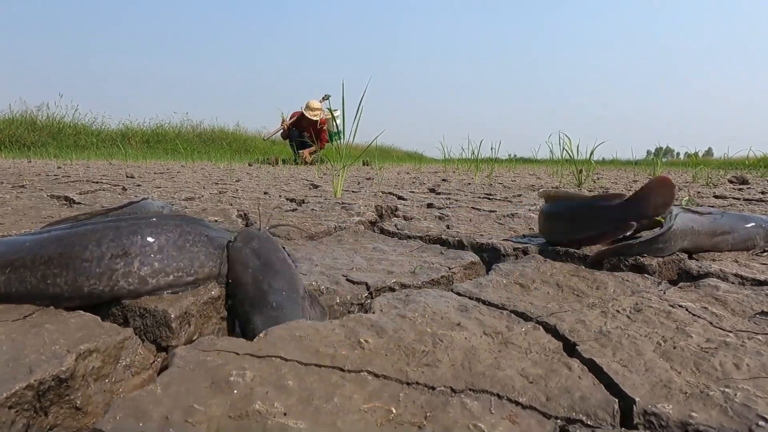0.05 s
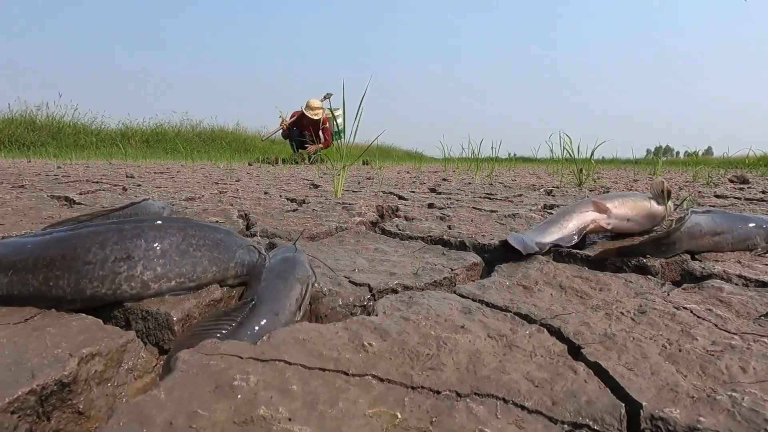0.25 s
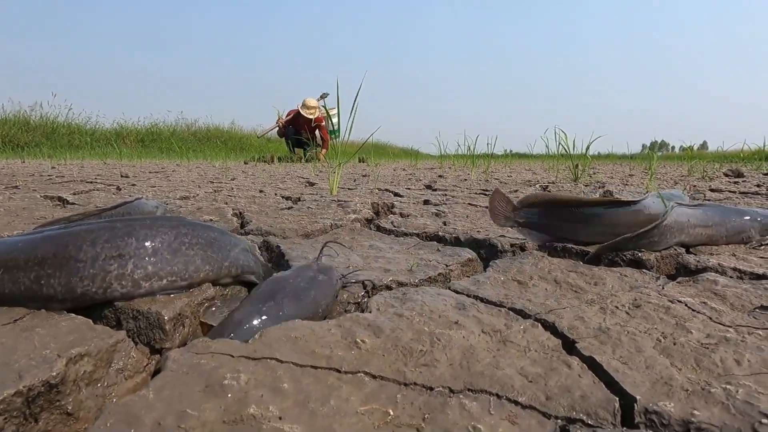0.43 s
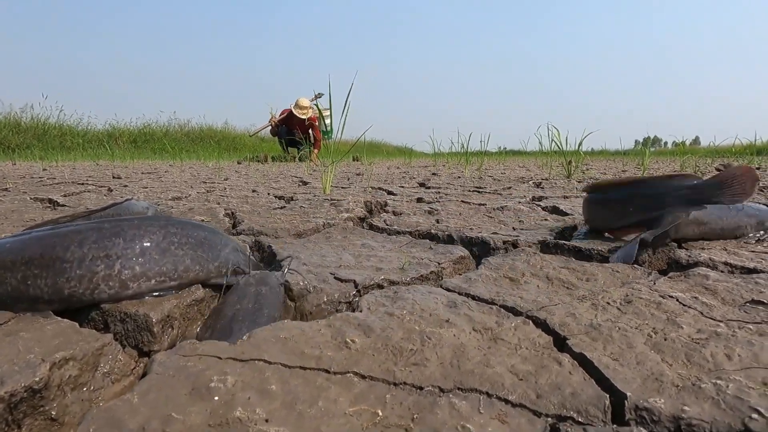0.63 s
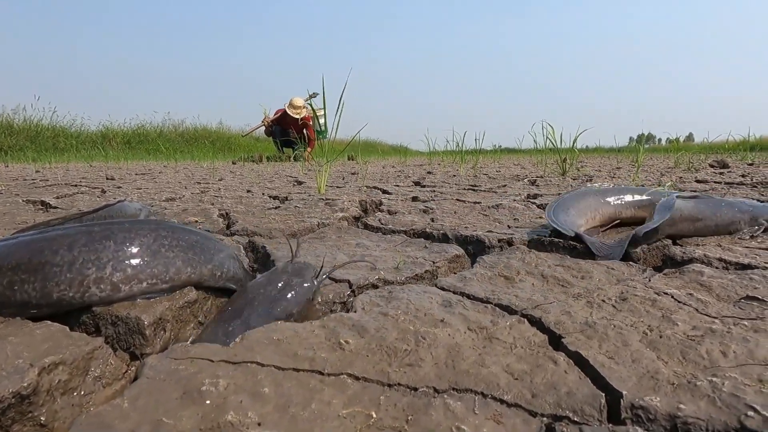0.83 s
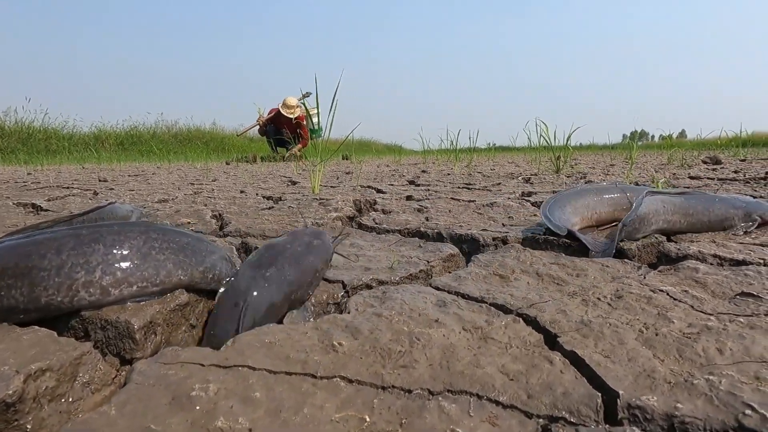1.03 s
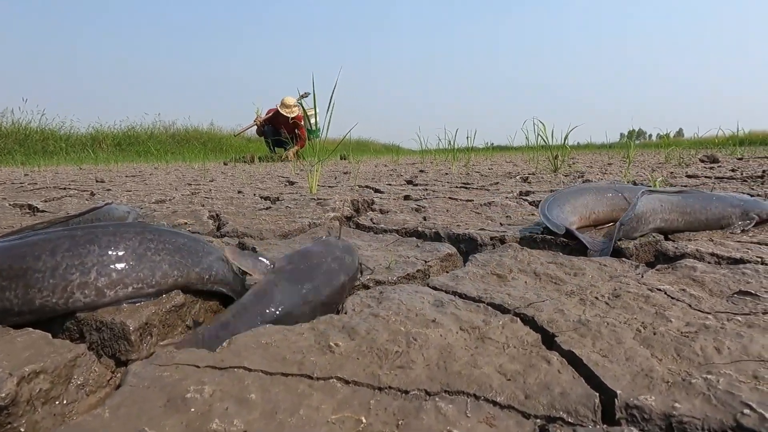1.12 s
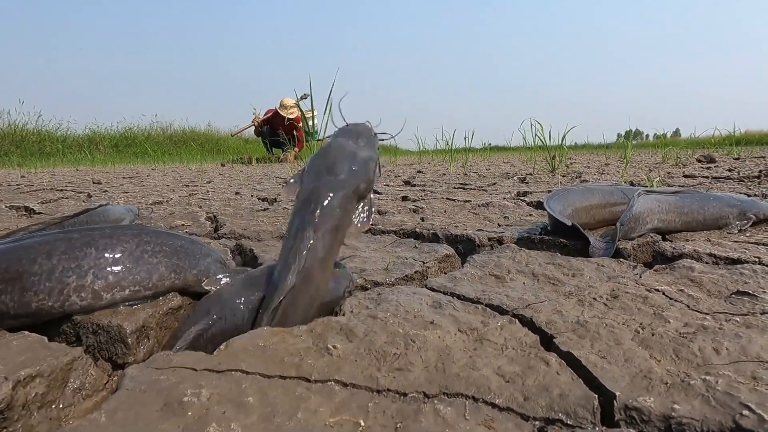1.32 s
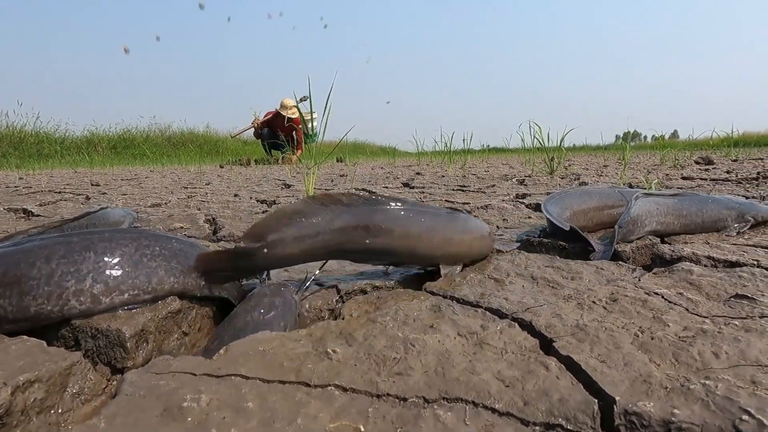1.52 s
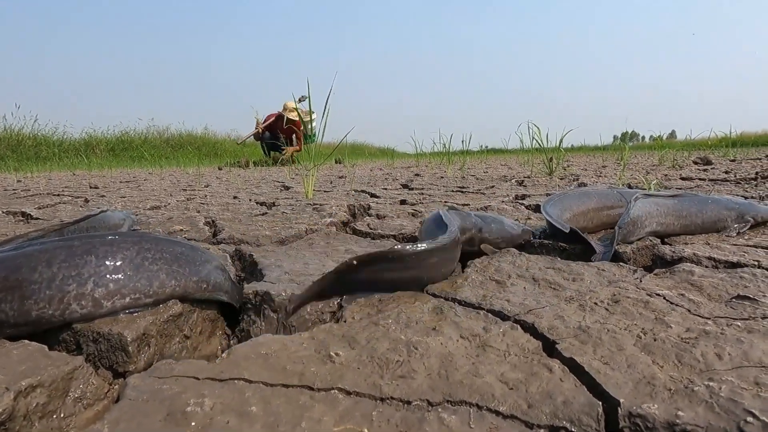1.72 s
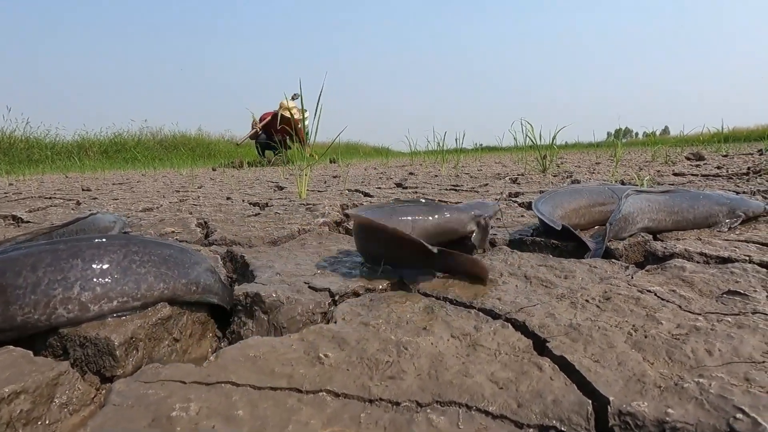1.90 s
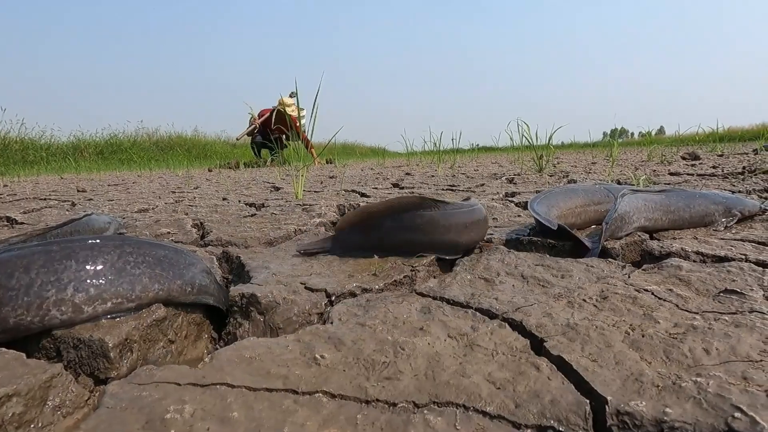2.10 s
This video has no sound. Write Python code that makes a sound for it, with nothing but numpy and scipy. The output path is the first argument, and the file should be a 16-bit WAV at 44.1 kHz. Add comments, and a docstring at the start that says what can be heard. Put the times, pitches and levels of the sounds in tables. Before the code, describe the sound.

Large fish thrash on cracked mud close to the microphone. Two bouts of wet squelching, popping and smacking come with dull thuds as their bodies land, over a light outdoor wind rumble and faint hiss.

```python
"""Catfish thrash on cracked mud close by, over a light wind rumble and a faint hiss.
Air pockets pop under their wet bodies, each stroke drags a crackling squelch of tiny bubbles
over the crust, and slimy skin smacks as it peels away. Heavy flops thud through the ground,
and the wet sounds bounce back faintly off the clods."""
import sys
import numpy as np
from scipy import signal
from scipy.fft import rfft, irfft
from scipy.io import wavfile

SR = 44100
rng = np.random.default_rng(int(sys.argv[2]) if len(sys.argv) > 2 else 0)


def dump_mix(stems):
    """Bounce the given channels to the path in sys.argv[1] as a 16-bit WAV at rate SR."""
    frames = np.atleast_2d(stems).T  # one column per channel
    limited = np.clip(frames, -1, 1)  # hard clip at full scale
    pcm = np.round(limited * 32767).astype(np.int16)
    wavfile.write(sys.argv[1], SR, pcm)


N = 94815
FFT_SIZE = N + 2048  # spare room for filters to ring out


def gain(db):
    """Turn decibels into a number to multiply by."""
    return 10 ** (np.asarray(db) / 20)


def normalise(x):
    """Scale a sound to an average strength (rms) of 1."""
    return x / np.sqrt(np.mean(x ** 2) + 1e-20)


def curve(points):
    """Join (frequency, value) points into a curve over the whole spectrum."""
    hz, value = np.array(points, float).T
    spectrum_hz = np.maximum(np.fft.rfftfreq(FFT_SIZE, 1 / SR), 1)
    return np.interp(np.log(spectrum_hz), np.log(hz), value)


def colour(x, points):
    """Turn frequencies up or down along a curve of f/Hz, level/dB points."""
    return irfft(rfft(x, FFT_SIZE) * gain(curve(points)), FFT_SIZE)[..., :N]


def noise_band(size, hz, octaves, spiky=0):
    """Noise reaching so many octaves either side of a pitch; spiky noise crackles."""
    edges = [hz / 2 ** octaves, min(hz * 2 ** octaves, SR / 2 - 1000)]
    noise = rng.standard_normal(size) * np.exp(spiky * np.minimum(rng.standard_normal(size), 2))
    return normalise(signal.sosfilt(signal.butter(2, edges, "band", fs=SR, output="sos"), noise))


def swell(t, rise, fade):
    """Rise smoothly from t = 0, then die away."""
    return np.sin(np.pi / 2 * np.clip(t / rise, 0, 1)) ** 2 * np.exp(-np.maximum(t - rise, 0) / fade)


def add(out, start, x):
    """Mix a sound in at a start time in seconds."""
    i = int(np.clip(start * SR, 0, N))
    out[..., i:i + x.shape[-1]] += x[..., :N - i]


def two_sides(source, apart):
    """Left and right of a random sound: alike when apart is 0, unrelated when it is 1."""
    return np.sqrt(1 - apart) * source() + np.sqrt(apart) * np.array([source(), source()])


# The tone of the wind: f/Hz, relative level/dB
WIND_TONE = [(12, -13), (22, -10), (42, 5), (62, -9), (93, -2.5), (130, -22), (185, -13), (230, -27),
             (500, -56), (2000, -66)]


def wind():
    """A low rumble, nearly the same on both sides, that rises and falls in gusts."""
    gusts = normalise(colour(rng.standard_normal(N), [(1, 10.5), (6, 12), (20, -86)]))
    noise = rng.standard_normal(N) + gain(-17) * rng.standard_normal((2, N))
    return gain(-43 + 5 * gusts) * normalise(colour(noise, WIND_TONE))


# The tone of the outdoor hiss: f/Hz, relative level/dB
HISS_TONE = [(60, -5), (250, -3), (480, 2), (780, -22), (1100, -13), (2500, -49), (5000, -35),
             (7000, -23.5), (10000, -29), (15000, -29)]


def hiss():
    """The faint, even noise of the open air, partly shared by both sides."""
    noise = rng.standard_normal((2, N)) + rng.standard_normal(N)
    return gain(-63.5) * normalise(colour(noise, HISS_TONE))


# Air pockets popping between skin and mud: t/s, f/Hz, level/dB, rise/s, fade/s, pitch slide/octaves
AIR_POCKETS = [(0.013, 1680, -39.5, 0.00047, 0.0033, 0.68), (0.158, 1043, -48.5, 0.0025, 0.0049, 0.58),
               (0.26, 893, -19, 0.0072, 0.0062, 0.84), (0.3411, 3980, -29.5, 0.001, 0.0021, -0.035),
               (0.34, 3230, -32.5, 0.0014, 0.0055, -0.081), (0.3403, 6730, -38, 0.0013, 0.003, -0.23),
               (0.3593, 1383, -28, 0.0016, 0.0065, 1.55), (0.3685, 2420, -27.5, 0.00086, 0.0015, 2.2),
               (0.3992, 1580, -28, 0.002, 0.0023, -1), (0.411, 1320, -29.5, 0.00072, 0.0017, -0.28),
               (0.443, 2010, -8.5, 0.00046, 0.001, -0.5), (0.446, 2090, -22, 0.00072, 0.00094, -0.52),
               (0.489, 1020, -26.5, 0.00028, 0.0053, 0.061), (0.4966, 2250, -27, 0.0019, 0.0006, 0.88),
               (0.523, 920, -22.5, 0.0019, 0.0021, 1.1), (0.5282, 630, -22, 0.0016, 0.0044, 0.045),
               (0.545, 552, -18.5, 0.0024, 0.0021, -0.17), (0.5478, 472, -21, 0.0059, 0.0014, -0.69),
               (0.5658, 910, -20, 0.00052, 0.0052, 0.47), (0.5712, 575, -17, 0.0035, 0.0011, 1.2),
               (0.58, 1260, -21.5, 0.00033, 0.0024, 1.1), (0.598, 997, -25.5, 0.0016, 0.011, -0.29),
               (0.6032, 1810, -25, 0.0015, 0.0015, 0.95), (0.65, 1384, -21.5, 0.0012, 0.0024, 0.32),
               (0.6477, 640, -18.5, 0.0014, 0.0015, -0.46), (0.666, 3250, -30.5, 0.0014, 0.0015, -0.65),
               (0.677, 689, -25, 0.0013, 0.01, 0.38), (0.6816, 398, -23.5, 0.0059, 0.0015, 1.64),
               (0.6987, 1363, -21.5, 0.00025, 0.0027, 1.4), (0.732, 538, -29.5, 0.006, 0.01, -0.69),
               (0.7687, 1673, -32.5, 0.00035, 0.006, -1.5), (0.7774, 515, -24, 0.0021, 0.0058, -0.45),
               (0.792, 1245, -32.5, 0.00044, 0.0054, -0.21), (0.802, 484, -26, 0.0034, 0.0022, -0.37),
               (0.8412, 436, -32.5, 0.0035, 0.0085, -0.03), (0.872, 434, -31.5, 0.01, 0.011, -0.073),
               (0.9256, 560, -28.5, 0.0005, 0.0013, 0.67), (1.027, 1730, -37.5, 0.0044, 0.0029, -0.052),
               (1.1195, 6790, -33, 0.001, 0.0022, -0.061), (1.1228, 2966, -29, 0.0041, 0.005, -0.04),
               (1.1367, 642, -18.5, 0.00058, 0.0081, 0.25), (1.165, 2950, -34, 0.002, 0.003, -0.15),
               (1.1773, 401, -22.5, 0.0012, 0.0041, 0.5), (1.1948, 517, -21.5, 0.0049, 0.0037, -0.59),
               (1.1955, 1256, -27.5, 0.0035, 0.0078, -0.075), (1.197, 2850, -34.5, 0.0018, 0.0027, 0),
               (1.2168, 443, -26.5, 0.0039, 0.0031, -0.57), (1.3251, 1660, -22.5, 0.0018, 0.0013, -0.33),
               (1.335, 396, -28.5, 0.00055, 0.01, -0.21), (1.3791, 590, -24.5, 0.0035, 0.0052, -0.54),
               (1.389, 1540, -28.5, 0.003, 0.0053, 1.4), (1.4182, 539, -7.5, 0.003, 0.0011, 0.044),
               (1.4242, 510, -16.5, 0.00033, 0.0028, -0.058), (1.426, 315, -22.5, 0.0026, 0.0094, -0.17),
               (1.4386, 490, -26, 0.0031, 0.0046, 0.43), (1.4498, 395, -23, 0.0005, 0.012, -0.83),
               (1.4587, 652, -22.5, 0.0057, 0.0049, 0.51), (1.4949, 770, -22, 0.00038, 0.00033, -0.24),
               (1.5205, 928, -20, 0.0062, 0.0048, 0.2), (1.5266, 352, -21, 0.0077, 0.0039, 0.0077),
               (1.602, 1444, -31.5, 0.0025, 0.006, 0.61), (1.614, 1930, -27.5, 0.0015, 0.0011, 1.5),
               (1.623, 1530, -29.5, 0.001, 0.003, -0.26), (1.633, 1300, -30.5, 0.0024, 0.0069, -0.054),
               (1.6584, 360, -24, 0.0053, 0.005, 0.37), (1.6602, 1090, -25, 0.0014, 0.0038, -0.51),
               (1.6713, 1223, -24, 0.0028, 0.006, -0.076), (1.6953, 1436, -22.5, 0.0021, 0.002, 0.69),
               (1.724, 381, -33.5, 0.0021, 0.014, -0.17), (1.7515, 511, -30.5, 0.0054, 0.0037, 0.6)]


def pops():
    """Each pocket rings and splashes, sliding in pitch as it resizes and wobbling as its walls give."""
    slide_s, wobble_octaves, trim_db = 0.0316, 0.03, -0.5
    out, t = np.zeros(N), np.arange(SR // 10) / SR
    for start, hz, db, rise, fade, slide in AIR_POCKETS:
        walls = noise_band(len(t), 175, octaves=1)
        pitch = hz * 2 ** (slide * np.tanh(t / slide_s) + wobble_octaves * walls)
        ring = np.sin(2 * np.pi * np.cumsum(pitch) / SR) * (1 + 0.1 * walls)
        splash = gain(-20.5) * noise_band(len(t), hz, octaves=0.61)
        shape = swell(t, max(rise, 0.5 / hz), max(fade, 0.78 / hz))  # low pops need time to ring
        add(out, start, gain(db + trim_db) * shape * (ring + splash))
    return out


def bubbles(low_hz, high_hz, per_second, fade_cycles, spread_db):
    """A steady stream of tiny bursting bubbles; the smallest ring highest and for the most cycles."""
    when, pitch, strength, length = rng.random((4, int(per_second * N / SR), 1))
    hz = low_hz * (high_hz / low_hz) ** pitch
    fade = fade_cycles * (0.5 + length) * np.sqrt(hz / low_hz)
    level = gain(-spread_db * np.log(np.maximum(strength, 0.01))) * np.sqrt(low_hz / hz)
    steps = np.arange(int(5 * fade_cycles * SR / low_hz))
    cycles = steps * hz / SR  # each bubble's age, counted in vibrations
    slide_up = 2 ** (0.066 * np.tanh(cycles / fade / 2))
    rings = level * swell(cycles, 0.9, fade) * np.sin(2 * np.pi * cycles * slide_up)
    positions = (when * N).astype(int) + steps
    return normalise(np.bincount(positions.ravel(), rings.ravel(), N)[:N])


# Large, middling and fine bubbles, heard as gurgle, squelch and crackle:
# lowest f/Hz, highest f/Hz, bubbles per second, fade/cycles, level spread/dB, sides apart (0-1)
BUBBLE_SIZES = [(305, 772, 710, 1.86, 2.5, 0), (898, 2880, 2200, 2.87, 3, 0),
                (2868, 13000, 3000, 5.5, 4, 0.28)]
# Quiet squirming that goes on between strokes: level/dB of gurgle, squelch and crackle
SQUIRMING = [-67.5, -63.5, -66]
# Strokes of a body over the mud: peak t/s, rise/s, fade/s, then level/dB of gurgle, squelch and crackle
BODY_STROKES = [(0.086, 0.019, 0.011, -52, -48, -51.5), (0.157, 0.012, 0.0039, -76, -49, -53.5),
                (.41, 0.037, 0.14, -47, -49, -50), (0.467, 0.017, 0.067, -34.5, -33, -43),
                (0.554, 0.017, 0.014, -28, -33, -40.5), (0.599, 0.023, 0.033, -48, -35, -50),
                (0.659, 0.028, 0.046, -34, -36, -43), (0.789, 0.046, 0.092, -45, -53.5, -59.5),
                (0.88, 0.012, 0.03, -41, -57, -82), (0.98, 0.0097, 0.078, -45.5, -53, -56.5),
                (1.065, 0.021, 0.13, -45.5, -44, -54), (1.172, 0.024, 0.033, -39, -39.5, -46),
                (1.319, 0.019, 0.045, -40, -37, -46), (1.406, 0.043, 0.066, -32.5, -33.5, -38.5),
                (1.459, 0.042, 0.069, -36.5, -36.5, -48), (1.598, 0.096, 0.097, -53, -45, -50.5),
                (1.662, 0.016, 0.035, -37.5, -39.5, -49), (1.747, 0.0083, 0.056, -48.5, -55, -56),
                (1.95, 0.28, 0.43, -54, -67, -83), (2.125, 0.058, 0.014, -78, -53.5, -54)]


def strokes():
    """Sliding bodies squeeze out three sizes of bubbles, louder with each stroke."""
    out, t = np.zeros((2, N)), np.arange(N) / SR
    for size, (*settings, apart) in enumerate(BUBBLE_SIZES):
        power = gain(SQUIRMING[size]) ** 2
        for peak, rise, fade, *levels_db in BODY_STROKES:
            power += (gain(levels_db[size]) * swell(t - peak + rise, rise, fade)) ** 2
        out += np.sqrt(power) * two_sides(lambda: bubbles(*settings), apart)
    return out


# Wet skin smacking and peeling off: t/s, centre f/Hz, level/dB, fade/s
SKIN_SMACKS = [(0.0726, 4500, -41, 0.0013), (0.0862, 3210, -38, 0.0015), (0.245, 5780, -42.5, 0.0034),
               (0.3405, 3600, -32.5, 0.0042), (0.361, 2250, -30.5, 0.0062), (0.387, 5400, -39, 0.0036),
               (0.4012, 3880, -36.5, 0.003), (0.458, 4140, -30, 0.005), (0.464, 6400, -29, 0.0024),
               (0.469, 4000, -22.5, 0.002), (0.478, 5960, -30, 0.0013), (0.489, 3890, -24.5, 0.0018),
               (0.5515, 3500, -23, 0.0023), (0.565, 1490, -31, 0.0052), (0.6397, 3850, -29.5, 0.002),
               (0.66, 4200, -38, 0.0013), (0.6985, 2550, -24.5, 0.0016), (0.736, 2940, -33, 0.0011),
               (0.7916, 4270, -36.5, 0.0032), (0.9719, 5670, -41.5, 0.0015), (1.024, 3850, -26.5, 0.0025),
               (1.0545, 7200, -33, 0.0031), (1.0903, 3500, -35, 0.0032), (1.119, 5480, -22, 0.0018),
               (1.1587, 6660, -39, 0.0011), (1.174, 3260, -33.5, 0.0032), (1.249, 4940, -31, 0.0017),
               (1.3115, 3400, -30.5, 0.0023), (1.335, 2990, -19, 0.0026), (1.4, 3850, -39, 0.001),
               (1.4117, 5100, -29, 0.0055), (1.4608, 2770, -28, 0.0016), (1.472, 2920, -26.5, 0.0017),
               (1.4946, 3700, -26.5, 0.0021), (1.5095, 4570, -18.5, 0.0028), (1.582, 3480, -36, 0.0017),
               (1.6236, 6500, -35.5, 0.0012), (1.63, 2960, -26.5, 0.0025), (1.643, 4700, -39.5, 0.0016),
               (1.6601, 4140, -26.5, 0.0023), (1.67, 3300, -28, 0.0008), (1.849, 5340, -38, 0.00052),
               (1.8684, 2420, -31, 0.00093), (1.965, 5640, -43, 0.0012)]


def smacks():
    """A film of slime tears with a sharp crackle, rings the gap it opens and leaves a short spray."""
    rise_s, trim_db = 0.0013, -4.5
    out, t = np.zeros((2, N)), np.arange(SR // 16) / SR
    spray = gain(-44) * swell(t, rise_s, fade=0.0071)
    for start, hz, db, fade in SKIN_SMACKS:
        crackle = two_sides(lambda: noise_band(len(t), hz, octaves=0.5, spiky=0.4), apart=0.66)
        tear = (swell(t, rise_s, fade) + spray) * crackle
        ring = gain(-5.5) * swell(t, rise_s, fade=0.0021) * np.sin(2 * np.pi * hz * t)
        add(out, start, gain(db + trim_db) * (tear + ring))
    return out


# Bodies landing on the ground: t/s, f/Hz, level/dB, fade/s
FLOPS = [(0.183, 88.5, -35.5, 0.042), (0.221, 44.3, -22.5, 0.029), (0.248, 101, -21, 0.014),
         (.32, 80.5, -34.5, 0.043), (.37, 75, -13.5, 0.0057), (0.39, 92, -26.5, 0.038),
         (.485, 55.5, -31.5, 0.032), (0.846, 72.5, -27, 0.022), (1.094, 44, -22, 0.03),
         (1.17, 43, -24.5, 0.026), (1.214, 93, -24.5, 0.031), (1.3, 116, -35, 0.0096),
         (1.454, 86.2, -29, 0.037), (1.547, 78, -30.5, 0.015), (1.647, 52.5, -29, 0.013),
         (1.662, 94, -24.5, 0.036), (1.739, 96, -30, 0.019), (1.853, 51.5, -22.5, 0.0082),
         (2.029, 83, -30.5, 0.036)]


def thuds():
    """The ground gives under each flop and shakes slowly a few times."""
    rise_s, trim_db = 0.0082, -4
    out, t = np.zeros(N), np.arange(SR // 3) / SR
    for start, hz, db, fade in FLOPS:
        shake = -np.sin(2 * np.pi * hz * t)
        add(out, start, gain(db + trim_db) * swell(t, rise_s, fade) * shake)
    return out


# The tone of the echo off the clods: f/Hz, relative level/dB
ECHO_TONE = [(200, 4.2), (700, 0.69), (2000, 7.7), (5000, 10.1), (12000, 2.7)]


def clod_echo(x):
    """Broken ground throws back a short blur of echoes, different in each ear."""
    t = np.arange(SR // 6) / SR
    bounces = rng.standard_normal((2, len(t))) * swell(t, rise=0.00094, fade=0.016)
    bounces = normalise(bounces) / np.sqrt(len(t))
    echo = signal.fftconvolve(x[None], bounces, axes=1)[:, :N]
    return gain(-19.5) * colour(echo, ECHO_TONE)


# How much louder the left side is than the right: f/Hz, level/dB
LEFT_LOUDER = [(50, -4.5), (300, -2.2), (600, -2.3), (1000, 1), (2000, 4.2), (4000, 7), (8000, 8.5),
               (12000, 15)]
# How far the left wave runs ahead of the right: f/Hz, phase/radians
LEFT_AHEAD = [(50, -0.076), (125, -0.76), (300, -1.4), (600, -1.3), (1500, -1.2), (3000, -1.06),
              (5000, 0.98), (12000, -2)]


def microphone_openings(pair):
    """The microphone's two openings differ in level and timing; their average keeps its level."""
    left = gain(curve(LEFT_LOUDER) / 2) * np.exp(0.5j * curve(LEFT_AHEAD))
    sides = np.array([left, 1 / left])
    sides /= np.maximum(abs(sides.mean(axis=0)), 0.5)
    return irfft(rfft(pair, FFT_SIZE) * sides, FFT_SIZE)[:, :N]


def scene():
    """The fish just in front of the microphone, in the open air."""
    outdoors = wind() + hiss()
    wet = pops() + strokes() + smacks()
    return microphone_openings(outdoors + wet + thuds() + clod_echo(wet.mean(axis=0)))


# The tone of the microphone: f/Hz, level/dB
MIC_TONE = [(20, 0), (3000, -0.5), (5500, -0.5), (7100, 2), (9000, -2.5), (11000, -9), (12200, -8.5),
            (13200, -13.5), (14400, -15), (16000, -22)]


def record(dry):
    """The microphone softens the treble, and the very highest sounds are cut off."""
    top_hz = 14900
    top_cut = signal.ellip(8, 0.2, 80, top_hz, fs=SR, output="sos")
    return signal.sosfilt(top_cut, colour(dry, MIC_TONE))


dry = scene()
out = record(dry)
dump_mix(out)
```